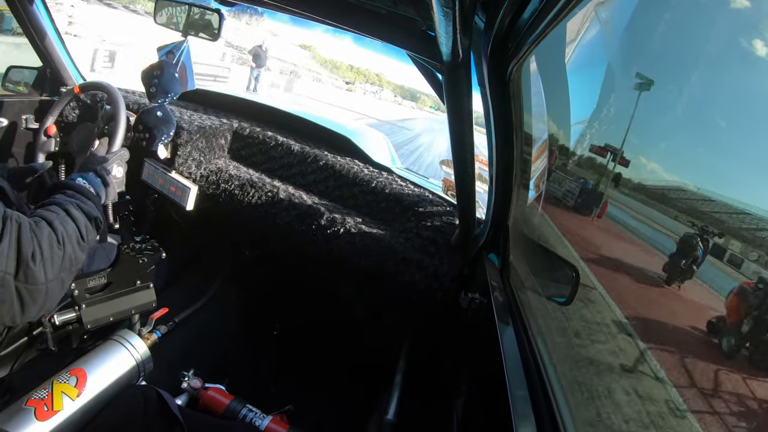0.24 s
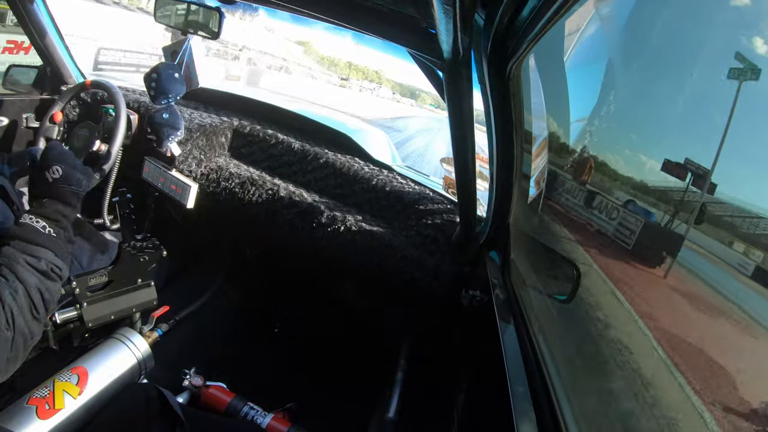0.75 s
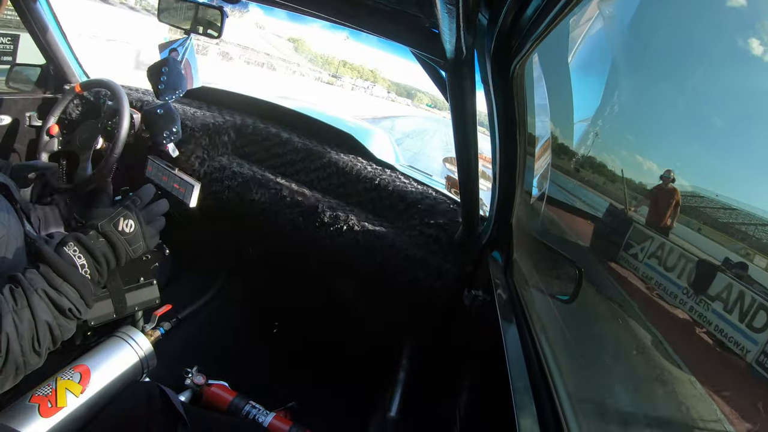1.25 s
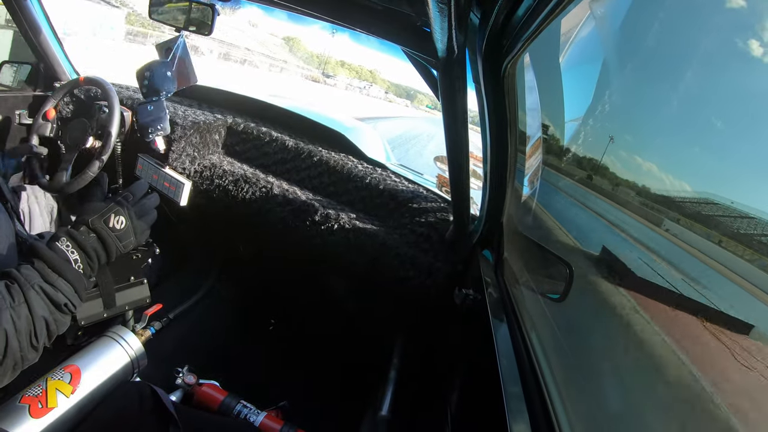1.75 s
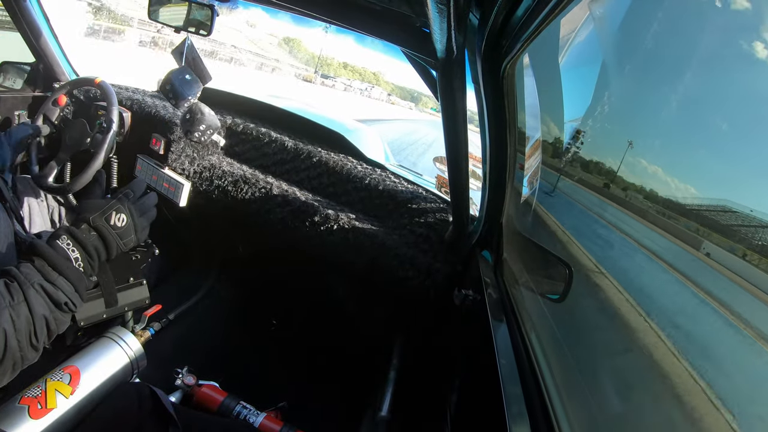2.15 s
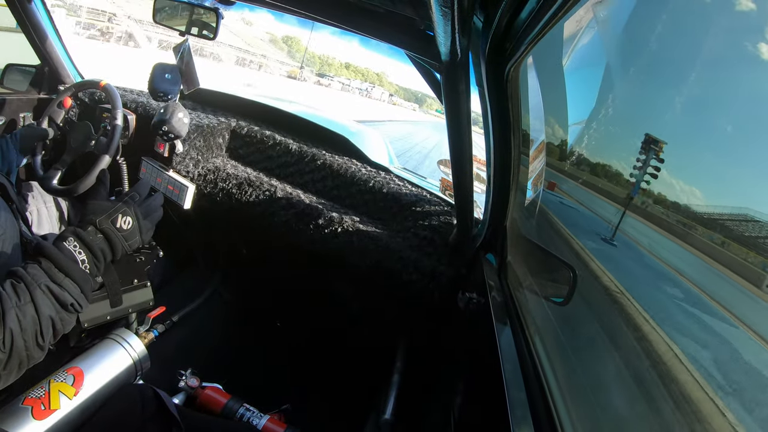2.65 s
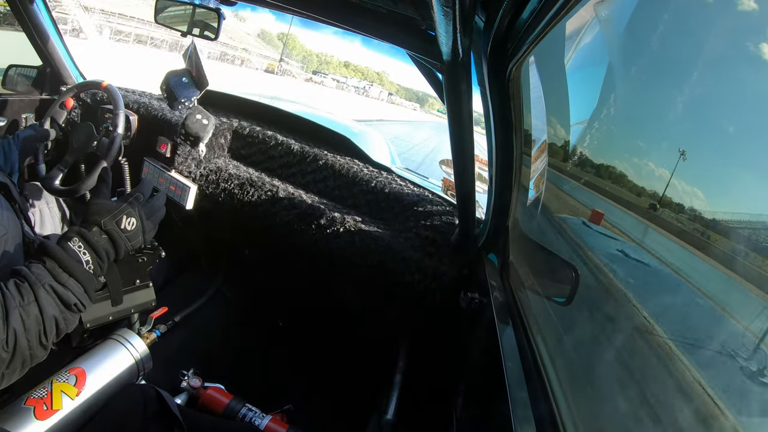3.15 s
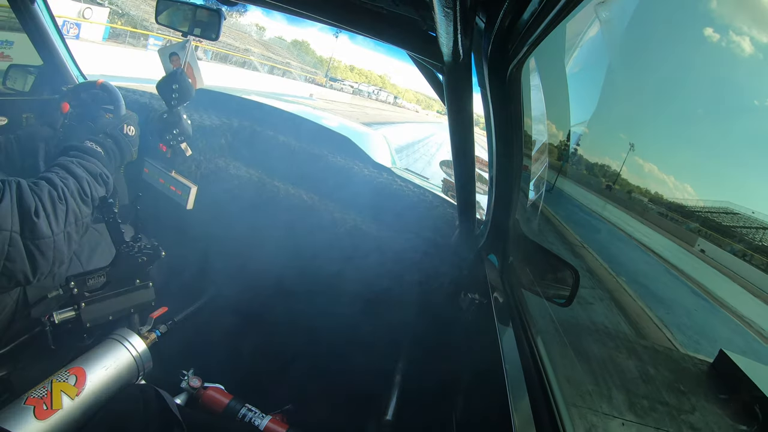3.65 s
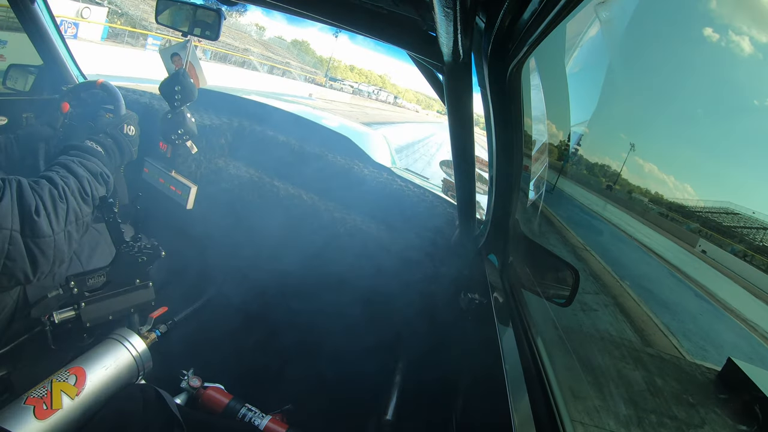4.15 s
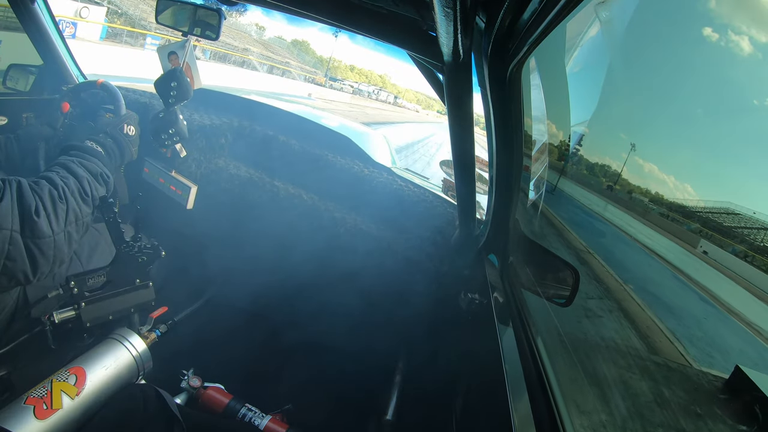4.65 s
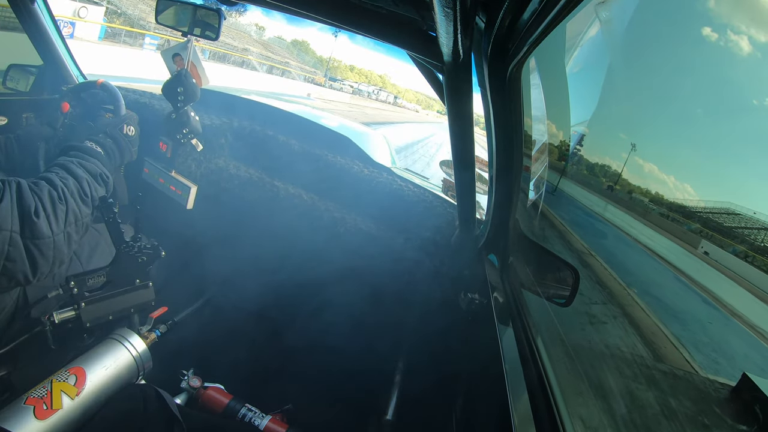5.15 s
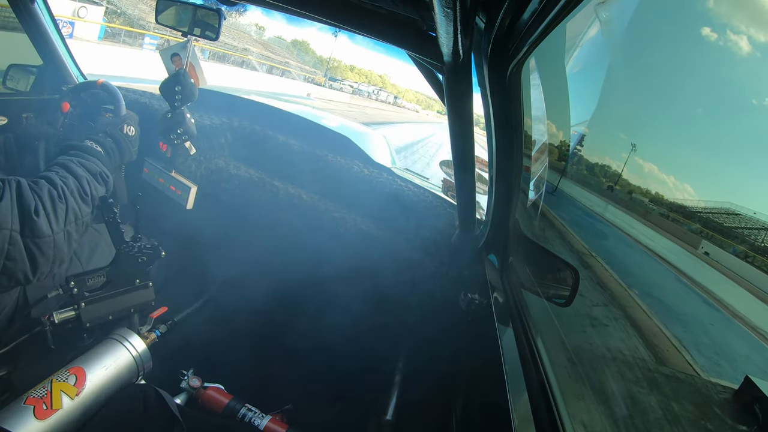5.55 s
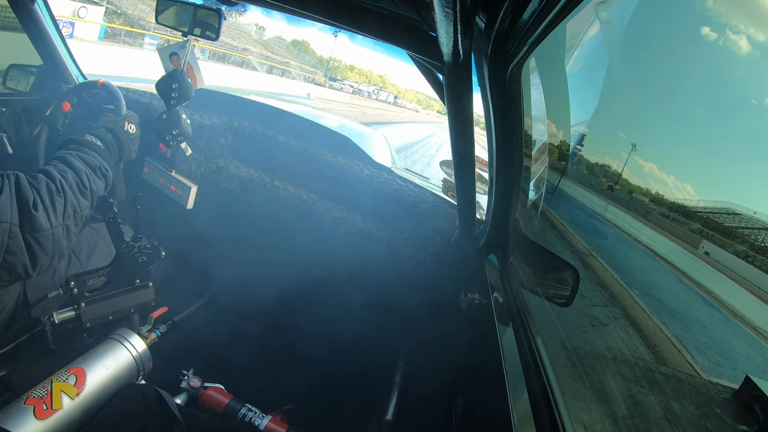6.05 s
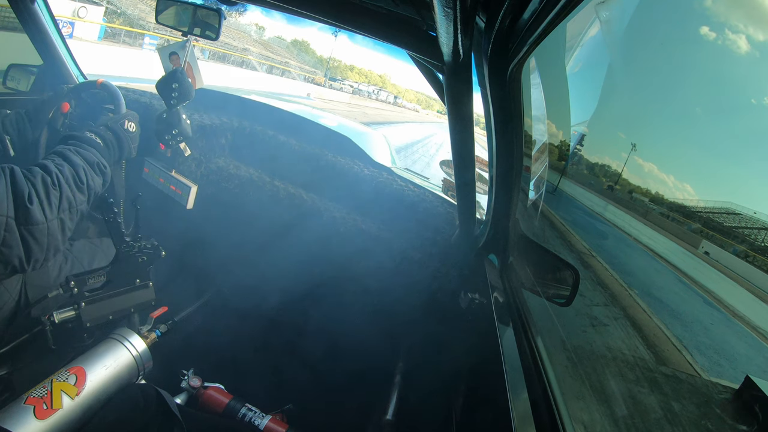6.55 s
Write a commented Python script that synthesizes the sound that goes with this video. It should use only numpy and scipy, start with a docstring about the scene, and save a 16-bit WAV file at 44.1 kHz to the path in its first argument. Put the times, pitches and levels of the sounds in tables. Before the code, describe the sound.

Turbocharged V8 burnout heard in the cabin: loud held revs, blow-off rush and burbling run-down, rolling drone, abrupt cut to throbbing idle, final rev.

```python
"""Inside a turbocharged V8 drag car: a burnout near 8000 rpm sings in clean multiples of the cycle rate, the turbo whistling.
At 0.8 s the throttle shuts: the exhaust barks, boost hisses from a valve as filtered noise and the revs collapse in a burble.
The car rolls on with droning panels while the whistle, a sine at shaft rate with overtones, slides down.
At 3.5 s rolling noise and whistle break off abruptly; the car stands at a lumpy idle of scattered pulses and whooping throbs.
At the end it revs again, its orders climbing through the cabin's booms."""
import sys
import numpy as np
from scipy import signal
from scipy.fft import rfft, irfft, next_fast_len
from scipy.io import wavfile
from scipy.ndimage import uniform_filter1d

SR = 44100
rng = np.random.default_rng(int(sys.argv[2]) if len(sys.argv) > 2 else 0)


def wav_out(sig):
    """Save sig, one row per channel (or a flat mono array), as 16-bit PCM at SR to the path in sys.argv[1]."""
    wavfile.write(sys.argv[1], SR, np.round(np.clip(np.atleast_2d(sig).T, -1, 1) * 32767).astype(np.int16))


N = 299439
TIME_S = np.arange(N) / SR
# the driver lifts off; the engine catches itself again at the bottom of the run-down
LIFT_S, CATCH_S = 0.807, 1.79
# rolling noise and whistle break off abruptly; from here the car stands idling
BREAK_OFF_S = 3.485


def undb(db):
    """Logarithmic level: decibels become an amplitude ratio."""
    return 10 ** (np.asarray(db) / 20)


def curves(rows):
    """Linear interpolation: each column of a table, joined by straight lines in time."""
    s, *columns = np.transpose(rows)
    return [np.interp(TIME_S, s, column) for column in columns]


def gate(on_s, off_s, attack_s, release_s):
    """Linear envelope: attack, hold and release between 0 and 1."""
    rise = np.clip((TIME_S - on_s) / attack_s, 0, 1)
    fall = np.clip(1 - (TIME_S - off_s) / release_s, 0, 1)
    return rise * fall


def bumps(rows, width_s):
    """Gaussian envelope: a level in dB with a short bell at each row."""
    return sum(db * np.exp(-.5 * np.minimum(np.abs(TIME_S - s) / width_s, 10) ** 2) for s, db in rows)


def noise():
    """White noise: equal power at every frequency."""
    return rng.standard_normal(N)


def walk(rate):
    """Slow random modulation: levels held 1 / rate s and slewed twice; spread near 1."""
    hold = max(int(SR / rate), 2)
    steps = np.repeat(rng.standard_normal(N // hold + 1), hold)
    return 1.18 * uniform_filter1d(uniform_filter1d(steps, hold), hold)[:N]


def steady(x, span_s=0.069):
    """Power normalisation: the running rms is brought to 1."""
    span = max(int(span_s * SR), 2)
    power = uniform_filter1d(uniform_filter1d(x ** 2, span), span)
    return x / np.sqrt(np.abs(power) + 1e-14)


def colour(x, points, modes=()):
    """Minimum-phase filtering: a spectrum with resonances on top, falling 20 dB more per octave past its end."""
    size = next_fast_len(N + SR // 2, True) // 2 * 2
    f = np.arange(size // 2 + 1) * SR / size
    hz, db = np.transpose(points)
    gain_db = np.interp(np.log(f + 1), np.log(hz), db) - 20 * np.log2(np.maximum(f / hz[-1], 1))
    for centre, width, peak_db in modes:
        gain_db = gain_db + peak_db / (1 + (2 * (f - centre) / width) ** 2)
    # folding the cepstrum onto positive time makes the filter causal
    cepstrum = irfft(np.log(undb(gain_db)))
    cepstrum[1:size // 2] *= 2
    cepstrum[size // 2 + 1:] = 0
    return irfft(rfft(x, size) * np.exp(rfft(cepstrum)))[:N]


# side minus mid in the cabin, before each source's own side level: (frequency [Hz], level [dB])
CABIN_WIDTH = [(60, -27), (125, -18), (250, -23.5), (500, -7), (750, -6.5), (1200, 4), (2200, -2),
               (4000, -7), (8000, 2.5), (12000, 0)]


def spread(x, side_db=0, lag_s=0.0111):
    """Diffuse reflection: a different lag at each frequency makes the side signal."""
    size = next_fast_len(N + SR // 4, True)
    f = np.arange(size // 2 + 1) * SR / size
    lag = np.interp(f, np.linspace(0, SR / 2, 2 ** 8), rng.random(2 ** 8)) * lag_s
    hz, db = np.transpose(CABIN_WIDTH)
    side_gain = undb(np.interp(np.log(f + 1), np.log(hz), db) + side_db)
    # phase is the running sum of group delay over frequency
    phase = -2j * np.pi * np.cumsum(lag) * f[1]
    side = irfft(rfft(x, size) * side_gain * np.exp(phase), size)[:N]
    return np.array([x + side, x - side])


# firing sequence of one four-stroke cycle: which bank fires (0 near, 1 far)
FAR_BANK = [0, 1, 1, 0, 1, 0, 0, 1]


def cycle_angle(count):
    """Periodicity: one turn of phase for each four-stroke cycle of the engine [rad]."""
    return 2 * np.pi * count / len(FAR_BANK)


def firings(count, scatter_db, far_db, far_lag):
    """Impulse excitation: a pulse per firing; the cross-plane crank shares them unevenly, which gives the lope."""
    k = np.arange(1, int(count[-1]))
    chance = rng.standard_normal((len(k), 2))
    far = np.array(FAR_BANK)[k % len(FAR_BANK)]
    at = np.searchsorted(count, k)
    # timing jitter grows with the scatter; the far bank's gas has the longer pipe
    jitter = .02 * scatter_db[at] * chance[:, 0]
    place = np.interp(k + far * far_lag[at] + jitter, count, np.arange(N))
    size = undb(far * far_db[at] + scatter_db[at] * np.minimum(chance[:, 1], .5))
    # each pulse is shared between the two nearest samples
    whole, part = place.astype(int), place % 1
    return np.bincount(np.r_[whole, whole + 1], np.r_[size * (1 - part), size * part], N)[:N]


def puffs(pulses, decay_s, depth):
    """Amplitude modulation: noise flares with each firing and decays exponentially."""
    flare = steady(signal.lfilter([1], [1, -np.exp(-1 / (decay_s * SR))], pulses))
    depth = np.clip(depth, 0, 1)
    return noise() * (1 - depth + depth * flare)


# relative strengths of the full-load tone: (multiple of the cycle rate, level [dB])
LOAD_ORDERS = [(1, -32), (2, -3), (3, -4.5), (4, -5), (5, -7), (6, -11), (7, -18), (8, -2.5), (9, -23),
               (11, -23.5), (12, -21), (13, -8.5), (14, -9.5), (15, -9), (16, -14.5), (18, -17.5),
               (20, -22.5), (22, -29), (23, -24), (25, -22), (27, -22), (28, -21), (32, -18), (34, -25)]


def load_tone(count, waver_db=2.5, wander=0.025):
    """Harmonic series: at full load every cycle is alike, so the exhaust sings in multiples of the cycle rate."""
    angle = cycle_angle(count) + wander * walk(39.8)
    tone = np.zeros(N)
    for k, db in LOAD_ORDERS:
        tone += undb(db + waver_db * walk(15.5)) * np.sin(k * angle + 2 * np.pi * rng.random())
    return steady(tone)


# combustion evens out as the throttle opens:
# (opening [0-1], scatter of the firings [dB], far bank level [dB], far bank lag [firings])
BURN = [(0, 4.3, -4.5, .38), (.25, 2.9, -2, .47), (1, 1.1, -2, .17)]
# combustion on the overrun: (scatter of the firings [dB], far bank level [dB], far bank lag [firings])
OVERRUN_BURN = (3, -1, 0.13)


def combustion(throttle, overrun):
    """Cyclic variation: scatter, far bank level and lag; an open throttle evens out the lumpy idle."""
    opening, *columns = np.transpose(BURN)
    return [np.interp(throttle, opening, column) * (1 - overrun) + coasting * overrun
            for column, coasting in zip(columns, OVERRUN_BURN)]


# cabin resonances: (frequency [Hz], width [Hz], gain [dB])
CABIN_MODES = [(81.3, 41, 7.5), (115.7, 44, 9.5), (142, 25, 5.5), (223.2, 23.7, 13.5), (252.3, 26, -8),
               (280.6, 32, 12), (317, 27, 2.5), (428.5, 26.7, 11.5), (564.4, 76, 9.5), (763, 85, 9.5),
               (900, 44, 4.5), (997, 96, 5), (1136, 39, 5), (1309, 12, 9.5)]
# relative spectra of exhaust, gas roar, rasp and intake hiss: (frequency [Hz], level [dB])
EXHAUST = [(8, -83), (32, -28), (60, -3), (88, 0), (125, -1.5), (180, -9), (320, -15), (420, -21.5),
           (700, -32.5), (1200, -42), (1700, -60), (5000, -72)]
ROAR = [(150, -27), (320, 4), (520, -3), (700, -1.5), (1000, -3), (1300, -6), (1600, -18.5), (3000, -46.5)]
RASP = [(900, -15.5), (1500, -4.5), (2200, -1), (2800, -3.5), (3600, -6.5), (4500, -13), (6500, -18.5),
        (10000, -55.5)]
HISS = [(2000, -20.5), (4000, -3.5), (6000, -2), (8000, -3), (8800, -6), (10200, -7), (10900, -22),
        (12300, -17), (13200, -24), (14500, -27.5)]
# relative spectrum of the valve gear's rattle: (frequency [Hz], level [dB])
TAPPETS = [(1500, -26), (2300, 0), (2750, 4.5), (3300, -3.5), (4200, -13), (7000, -40)]
TAPPETS_DB = -52
# narrow peaks and a dip in the treble of the hiss: (frequency [Hz], width [Hz], gain [dB])
HISS_PEAKS = [(4860, 90, 7.5), (6380, 87, -7.5), (7920, 180, 3)]
# the engine stumbles on weak firings: (time [s], level change [dB])
STUMBLES = [(1.676, -22), (1.755, -21), (1.781, -11), (2.03, -4), (2.111, -6), (2.326, -1), (2.452, 1),
            (2.768, -5), (2.91, -10), (3.284, -7), (3.331, -6), (3.844, -6.5), (4.001, -13), (4.305, -16),
            (4.592, -10), (4.822, -6), (5.108, -3), (5.193, -8), (5.326, -8), (5.488, -8), (5.627, -2),
            (5.7, -8), (5.81, -3.5), (5.984, -5), (6.13, -3), (6.267, -11)]
# the treble swells briefly at idle: (time [s], level [dB])
SWELLS = [(4.41, 1.5), (4.75, 4.5), (6.04, 4)]


def engine(count, load, burn, level_db, treble_pan_db=-1.5, flicker_db=1.7):
    """Source and resonator: exhaust pulses boom in the cabin; gas, valve gear and intake air add noise in step."""
    pulses = firings(count, *burn)
    sag_db, swell_db = bumps(STUMBLES, width_s=0.006), bumps(SWELLS, width_s=0.028)
    # off load the gas surges once per engine cycle
    surge_db = 2.4 * (1 - load) * np.sin(cycle_angle(count))

    exhaust = steady(colour(pulses, EXHAUST, CABIN_MODES), span_s=0.028)
    boom = np.sqrt(1 - load) * exhaust + 0.63 * np.sqrt(load) * load_tone(count)
    boom = boom * undb(level_db["boom"] + sag_db)

    roar = steady(colour(puffs(pulses, decay_s=0.015, depth=0.27), ROAR, CABIN_MODES))
    roar = roar * undb(level_db["roar"] + surge_db + 0.14 * sag_db)

    rasp = steady(colour(puffs(pulses, decay_s=0.019, depth=0.52), RASP))
    rasp = rasp * undb(level_db["rasp"] + 1.15 * swell_db + 0.29 * sag_db)

    hiss = steady(colour(puffs(pulses, decay_s=0.0072, depth=0.32), HISS, HISS_PEAKS))
    hiss = hiss * undb(level_db["hiss"] + swell_db + 0.5 * surge_db + flicker_db * walk(18))

    rattle = steady(colour(puffs(pulses, decay_s=0.0085, depth=0.63), TAPPETS))
    rattle = rattle * undb(TAPPETS_DB + .5 * surge_db + flicker_db * walk(13))

    pan = undb(np.array([[treble_pan_db], [-treble_pan_db]]) / 2)
    treble = spread(rasp + hiss + rattle, side_db=-0.7, lag_s=0.043) * pan
    return spread(boom + roar, side_db=-2.0) + treble


# how the cabin booms to a passing engine order: (frequency [Hz], gain [dB])
BOOMS = [(40, -22), (70, -7), (90, -2), (120, 2.5), (145, 1), (170, -3), (200, -5), (228, -0.5), (243, -12),
         (265, -5), (285, 0.5), (320, -1), (360, -17), (430, -10.5), (600, -19)]


def orders(count, hz, rows, waver_db, wander):
    """Order resonance: wavering multiples of the cycle rate swell as they glide through the cabin's booms."""
    angle = cycle_angle(count) + wander * walk(70)
    cycle_hz = hz / len(FAR_BANK)
    boom_hz, boom_db = np.transpose(BOOMS)
    sound = np.zeros(N)
    for k, db in rows:
        tone = np.sqrt(2) * np.sin(k * angle + 2 * np.pi * rng.random())
        cabin_db = np.interp(np.log(k * cycle_hz), np.log(boom_hz), boom_db)
        sound += tone * undb(db + cabin_db + waver_db * walk(30))
    return sound


# the note on the overrun, when pulling and on a light throttle, before the cabin's booms:
# (multiple of the cycle rate, level [dB])
OVERRUN_ORDERS = [(2, -26), (3, -27), (5, -25.5), (6, -30), (8, -24.5), (11, -29), (13, -31), (16, -33)]
PULL_ORDERS = [(3, -20.5), (5, -17.5), (8, -13.3), (9, -21.5), (11, -21.5), (13, -19.5), (16, -24),
               (20, -18), (27, -18), (32, -18), (40, -21), (48, -24)]
ROLL_ORDERS = [(5, -18.5), (6, -28), (8, -29), (12, -31), (15, -28)]
# the exhaust hoots as the falling firing rate passes the pipe's note
HOOT_HZ, HOOT_WIDTH_HZ, HOOT_DB = 228.4, 7.7, -18
# at high revs the overrun note is weak and wavers
RAGGED_ABOVE_HZ, RAGGED_DB = 240, -7


def sweeps(count, hz, falling, clean, cruising):
    """Order tracking: the note slides down on the overrun, chugs on a light throttle and climbs when pulling."""
    ragged = np.clip((hz - RAGGED_ABOVE_HZ) / 30, 0, 1)
    sliding = orders(count, hz, OVERRUN_ORDERS, waver_db=3.0, wander=.07)
    sliding = sliding * undb(ragged * (RAGGED_DB + 3 * walk(40)))
    hoot = np.sqrt(2) * np.sin(2 * np.pi * count) * undb(HOOT_DB)
    hoot = hoot * np.exp(-((hz - HOOT_HZ) / HOOT_WIDTH_HZ) ** 2)
    pulling = orders(count, hz, PULL_ORDERS, waver_db=0.4, wander=.012)
    chug = 1 + .45 * np.sin(cycle_angle(count))  # once a cycle
    drone = orders(count, hz, ROLL_ORDERS, waver_db=2.5, wander=.1) * chug
    return spread((sliding + hoot) * falling + pulling * clean + drone * cruising, side_db=-0.5)


# about every third idle cycle a run of strong firings throbs: (time [s], level [dB])
THROBS = [(3.563, -13), (3.76, -13), (4.164, -13), (4.381, -13), (4.581, -13), (4.792, -12.5), (5.017, -13),
          (5.237, -11.5), (5.454, -12.5), (5.673, -12), (5.895, -12), (6.109, -13), (6.31, -12)]
# each throb is a rising whoop and a short higher rebound:
# (delay [s], pitch [Hz], rise [Hz/s], attack [s], release [s], level [dB])
THROB_PARTS = [(0, 100.5, 1160, 0.024, 0.016, 0.5), (.112, 129.3, 200, 0.013, 0.012, -1)]


def throbs():
    """Frequency glide: strong firings crowd closer as they kick the crank. Gives sound and how firmly they catch."""
    sound, catching = np.zeros(N), np.zeros(N)
    for s, db in THROBS:
        for delay_s, hz, rise, attack_s, release_s, part_db in THROB_PARTS:
            age = TIME_S - s - delay_s
            near = np.abs(age) < .1
            age = age[near]
            swell = np.exp(-.5 * (age / np.where(age < 0, attack_s, release_s)) ** 2)
            turns = hz * age + rise * age ** 2 / 2 + rng.random()
            sound[near] += np.sqrt(2) * undb(db + part_db) * swell * np.sin(2 * np.pi * turns)
            catching[near] += swell
    return sound, np.minimum(catching, 1)


# relative spectrum of the exhaust's burble on the overrun: (frequency [Hz], level [dB])
BURBLE = [(100, -24), (160, 2), (218, 4.5), (250, 3.5), (290, 1), (350, -11), (440, -18), (600, -18),
          (1200, -23)]
BURBLE_DB, BURBLE_DB_PER_OCTAVE = -27.5, 2.5  # at idle revs, and per octave above


def burble(count, revs, overrun, scatter_db=4.0, far_db=-4, far_lag=0.23):
    """Pipe resonance: with the throttle shut the banks pop unevenly and their orders slide through the pipes' note."""
    pulses = firings(count, *(np.full(N, value * 1.) for value in (scatter_db, far_db, far_lag)))
    popping = steady(colour(pulses, BURBLE), span_s=0.1)
    return spread(popping * overrun * undb(BURBLE_DB + BURBLE_DB_PER_OCTAVE * revs))


def bark(at_s=0.796, width_s=0.015, db=-22.0):
    """Transient excitation: the exhaust barks once as the throttle snaps shut."""
    burst = steady(colour(noise(), [(300, -17), (650, 4), (780, 8), (860, -15), (1500, -22)]))
    return spread(burst * undb(db) * np.exp(-.5 * ((TIME_S - at_s) / width_s) ** 2))


# turbo shaft and its whistle before flutter: (time [s], shaft rate [Hz], level [dB])
TURBO = [(0, 5900, -40), (.17, 5920, -35.5), (.42, 6010, -44.5), (.62, 6060, -38.5), (.83, 6050, -36),
         (1.1, 4820, -37.5), (1.24, 4230, -41), (1.3, 4060, -35), (1.43, 3610, -34), (1.6, 3200, -42),
         (1.67, 3015, -40), (1.7, 2943, -36.5), (1.951, 2580, -32.5), (2.7, 2003, -33), (2.97, 1845, -43.5),
         (3.47, 1632, -45)]


def turbo_speed(inertia_s=0.0694):
    """Drag and inertia: against air drag the time of one turn changes evenly; inertia rounds each change. In Hz."""
    turn_s, = curves([(s, 1 / hz) for s, hz, _ in TURBO])
    return 1 / uniform_filter1d(turn_s, max(int(inertia_s * SR), 1), mode="nearest")


# the whistle's overtones before their patches: (time [s], second harmonic [dB], third harmonic [dB])
OVERTONES = [(1.65, -95, -95), (1.82, -47, -58), (2.08, -44, -45.5), (2.25, -50, -52), (2.42, -62, -55),
             (2.57, -44.5, -54), (2.75, -50, -51.5), (3.0, -44.5, -59), (3.2, -46, -56), (3.42, -57, -57)]


def turbo(hz, rolling, overrun, load, wobble=0.0013, surge_wobble=0.008):
    """Rotating-blade tone: a whistle at shaft rate, steadiest under load; its overtones come and go."""
    _, db = curves(TURBO)
    unsteady_hz = hz * (1 + (wobble + surge_wobble * overrun) * walk(250))
    angle = 2 * np.pi * np.cumsum(unsteady_hz) / SR
    fast_db = (4.2 + .8 * overrun - 2 * load) * np.minimum(walk(90), 1)
    slow_db = (5.2 - 3.2 * overrun - 4 * load) * np.minimum(walk(32), .6)
    whistle = np.sin(angle) * undb(db + fast_db + slow_db)
    for k, overtone_db in zip((2, 3), curves(OVERTONES)):
        patches_db = 5 * np.minimum(walk(25), .4) + 4 * np.minimum(walk(70), 1)
        whistle = whistle + np.sin(k * angle) * undb(overtone_db + patches_db)
    return spread(np.sqrt(2) * whistle * rolling, side_db=-2.0, lag_s=0.00401)


# relative spectrum of the rush in the valve's pipe: (frequency [Hz], level [dB])
VALVE = [(600, -7), (1400, -3), (2200, -2), (3000, -1.5), (3700, -4), (4500, -7), (6000, -11.5),
         (7500, -13.5), (10000, -31)]
# resonances of the blow-off valve and its pipe: (frequency [Hz], width [Hz], peak [dB])
VALVE_MODES = [(2006, 55, 8), (2206.3, 130, 8.5), (2740, 230, 3.5), (3680, 100, 7.5)]
# the jet hisses first and fades with the boost; the pipe's rush builds more slowly
JET_DB, JET_ATTACK_S, JET_FADE_DB_PER_S = -28.5, 0.27, 15.5
VALVE_DB, VALVE_ATTACK_S, VALVE_FADE_DB_PER_S = -24, 0.55, 4
VALVE_SHUTS_S, VALVE_RELEASE_S = 1.738, 0.15  # starts to shut, and takes this long


def blow_off():
    """Jet turbulence: with the throttle shut, the boost escapes through a valve."""
    open_s = np.maximum(TIME_S - LIFT_S, 0)
    jet = steady(colour(noise(), HISS)) * undb(JET_DB - JET_FADE_DB_PER_S * open_s)
    pipe = steady(colour(noise(), VALVE, VALVE_MODES)) * undb(VALVE_DB - VALVE_FADE_DB_PER_S * open_s)
    air = (jet * gate(LIFT_S, VALVE_SHUTS_S, JET_ATTACK_S, VALVE_RELEASE_S)
           + pipe * gate(LIFT_S, VALVE_SHUTS_S, VALVE_ATTACK_S, VALVE_RELEASE_S))
    return spread(air * undb(0.6 * walk(35.5)), side_db=-1.5, lag_s=.05)


# relative spectrum of the body's shake: (frequency [Hz], level [dB])
RUMBLE = [(12, -20.5), (24, -25), (34, -8), (50, -9), (70, -14), (140, -7), (500, -91)]


def chassis(count, load, shake_db, wheel_db=-26.5, wheel_side_db=-3, shaft_db=-16, second_db=-34):
    """Rotating imbalance: tyres thump and rock the shaking body, and the driveshaft beats against the crank."""
    wheel = 2 * np.pi * count / 14.9  # firings per wheel turn
    shaft = 4 * wheel
    thump = np.sin(wheel) * undb(wheel_db)
    spin = np.sin(shaft) * undb(shaft_db) + np.sin(2 * shaft) * undb(second_db)
    driveline = np.sqrt(2) * load * (thump + spin)
    rocking = np.sqrt(2) * load * np.cos(wheel) * undb(wheel_db + wheel_side_db)
    mid, side = (steady(colour(noise(), RUMBLE), span_s=0.08) * undb(shake_db) for _ in range(2))
    sideways = (rocking + undb(-9.5) * side) * np.array([[1], [-1]])
    return spread(driveline, side_db=7.0) + mid + sideways


# relative spectra of the panels' drone when rolling and when the engine pulls: (frequency [Hz], level [dB])
ROLL_DRONE = [(150, -40.5), (270, 7), (315, -15), (372, 10.5), (410, -5), (500, -14.5), (900, -42.5)]
PULL_DRONE = [(150, -45), (260, -9.5), (310, 7), (355, -13), (420, -12), (500, -16.5), (900, -34),
              (1550, -25), (2200, -42)]
# base levels, then what overrun and full load add to the rolling drone
ROLL_DRONE_DB, PULL_DRONE_DB, OVERRUN_DRONE_DB, LOAD_DRONE_DB = -30, -24, -10, -10


def panels(rolling, overrun, pull, load):
    """Panel resonance: the body drones near 270 and 372 Hz while rolling, near 310 Hz when the engine pulls."""
    road_db = ROLL_DRONE_DB + OVERRUN_DRONE_DB * overrun + LOAD_DRONE_DB * load
    road = steady(colour(noise(), ROLL_DRONE), span_s=0.12) * rolling * undb(road_db)
    strain = steady(colour(noise(), PULL_DRONE), span_s=0.085) * pull * undb(PULL_DRONE_DB)
    return spread(road + strain, side_db=-1.5)


# engine speed: (time [s], firing rate [Hz])
SPEED = [(0, 543), (.3, 540), (.42, 531), (.79, 519), (.87, 462), (.97, 410), (1.13, 236), (1.205, 221),
         (1.24, 207), (1.3, 187), (1.38, 158), (1.48, 124), (1.63, 112), (1.76, 100), (1.87, 123),
         (2.07, 150), (2.26, 150), (2.8, 138), (3.25, 135), (3.6, 122), (4.3, 112), (6.1, 110), (6.35, 94),
         (6.406, 117), (6.468, 151), (6.526, 183), (6.604, 208), (6.79, 241)]
# presses of the throttle: (start [s], end [s], opening [0-1], release [s])
PRESSES = [(-1, .8, 1, .12), (1.8, 2.6, .3, .8), (6.24, 7, 1, .1)]
PRESS_ATTACK_S = .17
LOAD_RELEASE_S = 0.1  # time constant of the full-load tone's decay after the lift
IDLE_HZ, TURBO_REST_HZ = 118, 700  # reference rates for revs and turbo speed in octaves
# level law of each part: (at idle [dB], revs [dB/octave], open throttle [dB], turbo speed [dB/octave],
# full load [dB], overrun [dB], revs while pulling [dB/octave])
LOUDNESS = {"boom": (-14, -0.6, 2.5, 0, 1, -9, -4), "roar": (-32.5, 3.5, 6, 1.0, -10, 2, 0.8),
            "rasp": (-48, -0.2, 5, 5.5, -3.5, -1.8, 5.5), "hiss": (-53.5, .5, 4, 3, 2.5, 2.5, 1.5),
            "shake": (-22.5, 2.5, -7, -0.73, -3, 1.5, -2)}
# the ragged boom gives way to the clean note
CLEAN_PULL_DB, CLEAN_ROLL_DB, CLEAN_THROB_DB = -9, -3.5, -6.5
THROB_GAS_DB, THROB_GAS_LAG_S = 2.5, 0.017  # the gas roars just after each throb


def scene():
    """Common drive: revs and throttle set the firings, wheels and levels; the turbo follows its own inertia."""
    hz, = curves(SPEED)
    turbo_hz = turbo_speed()
    lope, catching = throbs()

    presses = (opening * gate(on, off, PRESS_ATTACK_S, release) for on, off, opening, release in PRESSES)
    throttle = np.clip(sum(presses), 0, 1)
    load = np.clip(0.965 * np.exp(-np.maximum(TIME_S - LIFT_S, 0) / LOAD_RELEASE_S), 0, 1)
    overrun = gate(LIFT_S, CATCH_S, attack_s=0.16, release_s=0.039)
    falling = gate(LIFT_S, CATCH_S - .15, attack_s=0.04, release_s=0.099)
    rolling = gate(-1, BREAK_OFF_S, attack_s=.5, release_s=0.017)
    cruising = gate(CATCH_S, 3.04, attack_s=0.054, release_s=0.38)
    revs = np.log2(hz / IDLE_HZ)
    spool = rolling * np.log2(turbo_hz / TURBO_REST_HZ)
    pull = throttle * (1 - load)
    clean = pull ** 2

    controls = (1, revs, throttle, spool, load, overrun, pull * revs)
    level_db = {part: sum(db * control for db, control in zip(law, controls))
                for part, law in LOUDNESS.items()}
    clean_db = CLEAN_PULL_DB * clean + CLEAN_ROLL_DB * cruising + CLEAN_THROB_DB * catching
    level_db["boom"] = level_db["boom"] + clean_db
    late_catching = np.interp(TIME_S - THROB_GAS_LAG_S, TIME_S, catching)
    level_db["roar"] = level_db["roar"] + THROB_GAS_DB * late_catching ** 2

    burn = combustion(throttle, overrun)
    # uneven burning makes the crank hunt
    hunt_hz = 1.7 * burn[0] * (1 - load) * walk(16)
    count = np.cumsum(hz + hunt_hz) / SR  # firings so far

    return (engine(count, load, burn, level_db)
            + sweeps(count, hz, falling, clean, cruising)
            + spread(lope * (1 - clean), side_db=-4.5)
            + burble(count, revs, overrun)
            + bark()
            + turbo(turbo_hz, rolling, overrun, load)
            + blow_off()
            + chassis(count, load, level_db["shake"])
            + panels(rolling, overrun, pull, load))


def record(dry, drive=0.45, top_hz=14500):
    """Soft saturation and low-pass filtering: loud peaks are rounded, the top is cut and the end fades in 5 ms."""
    fade_out = np.clip(np.arange(N)[::-1] / (.005 * SR), 0, 1)
    rounded = np.tanh(drive * dry * fade_out) / drive
    low_pass = signal.ellip(8, .2, 70, top_hz, fs=SR, output="sos")
    return signal.sosfilt(low_pass, rounded)


dry = scene()
out = record(dry)
wav_out(out)
```